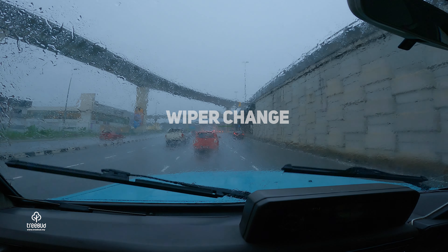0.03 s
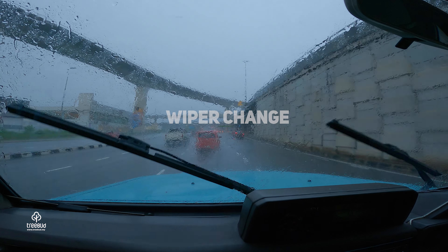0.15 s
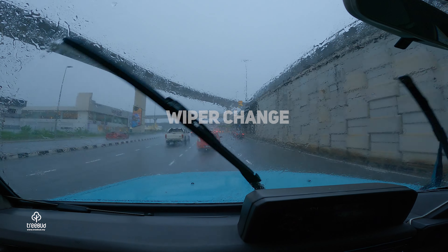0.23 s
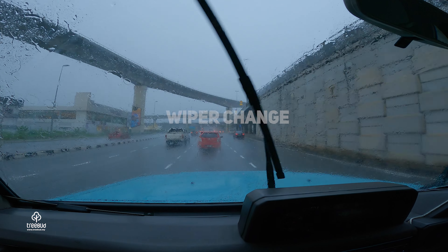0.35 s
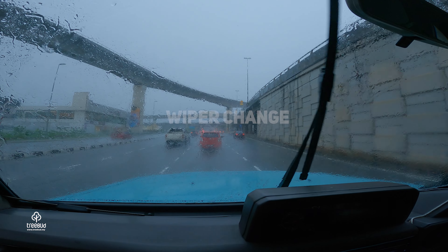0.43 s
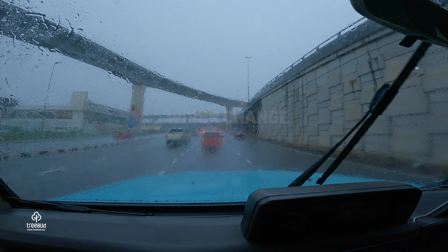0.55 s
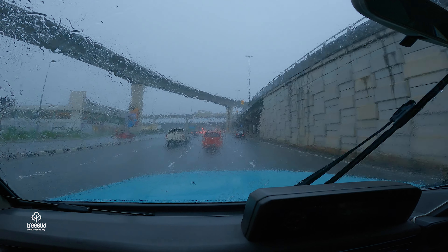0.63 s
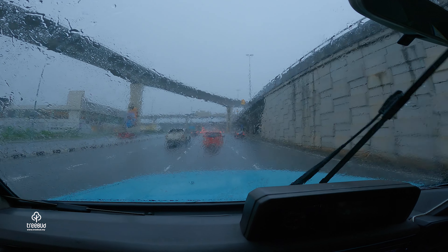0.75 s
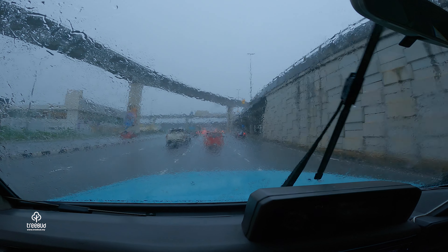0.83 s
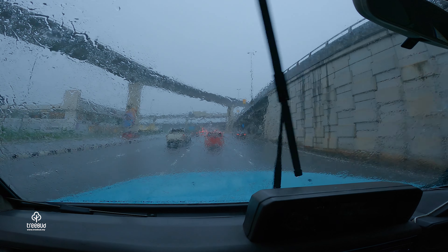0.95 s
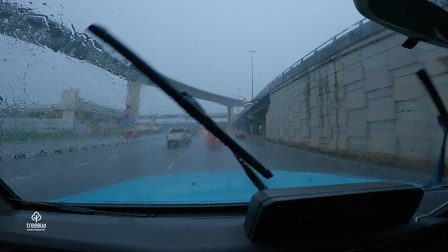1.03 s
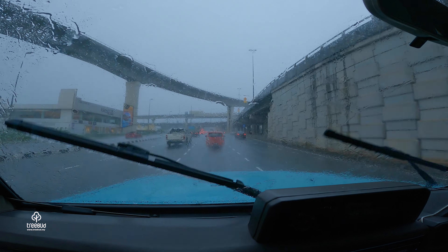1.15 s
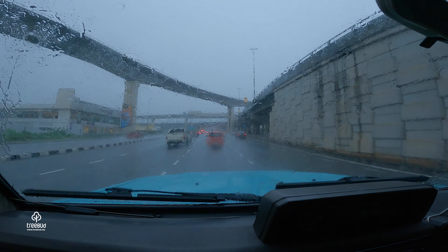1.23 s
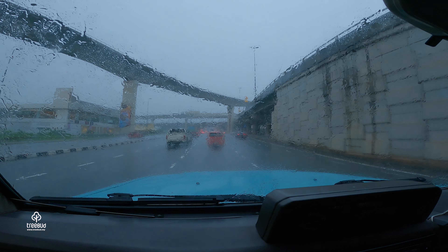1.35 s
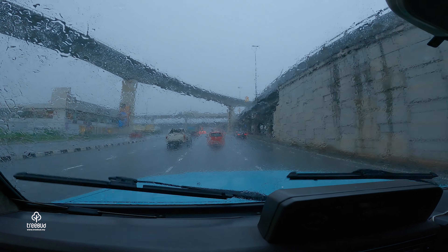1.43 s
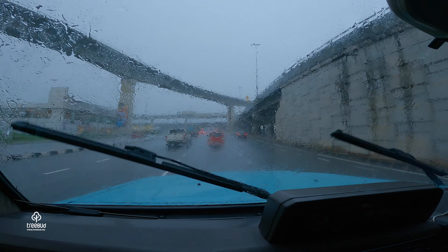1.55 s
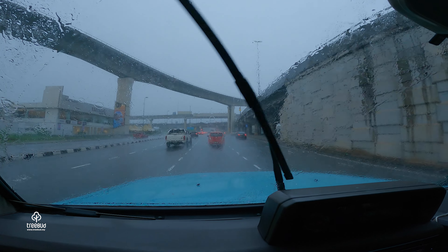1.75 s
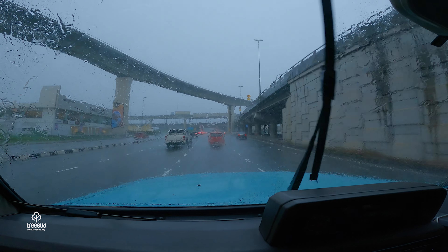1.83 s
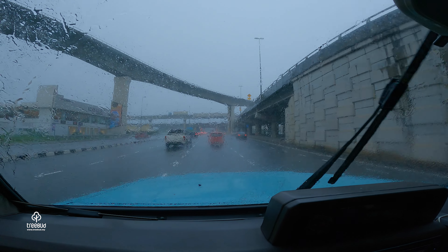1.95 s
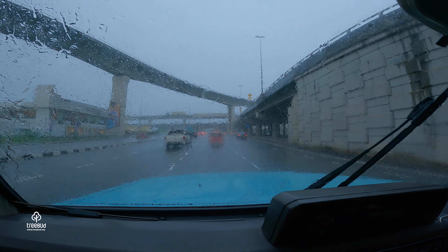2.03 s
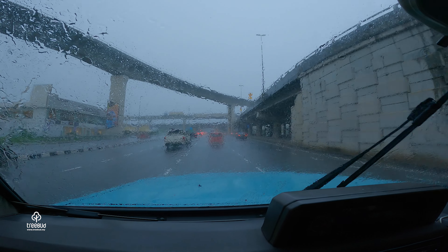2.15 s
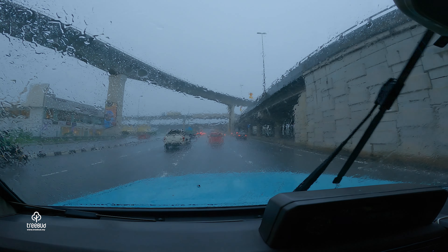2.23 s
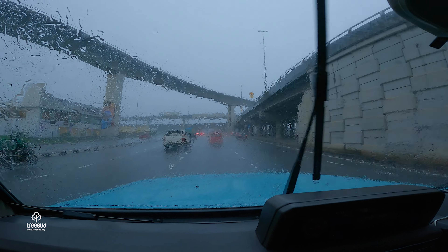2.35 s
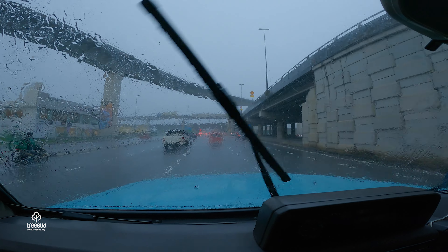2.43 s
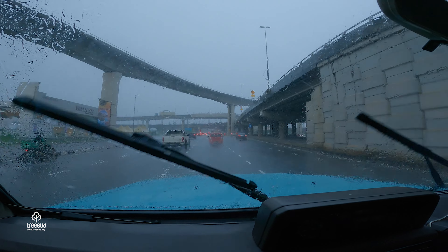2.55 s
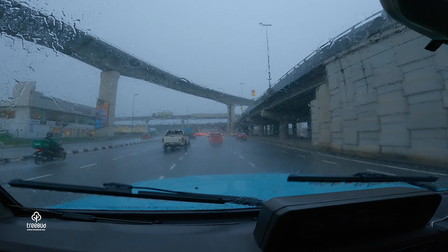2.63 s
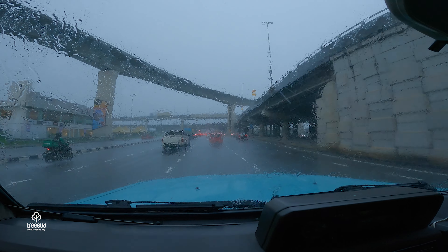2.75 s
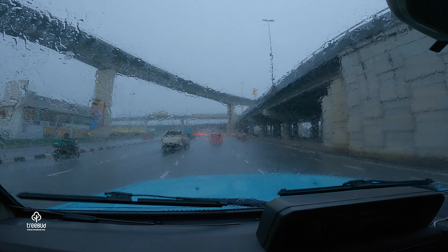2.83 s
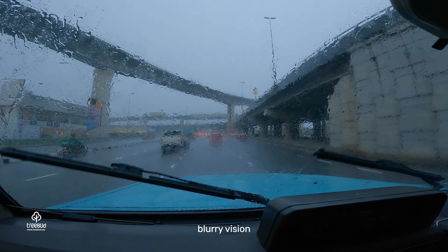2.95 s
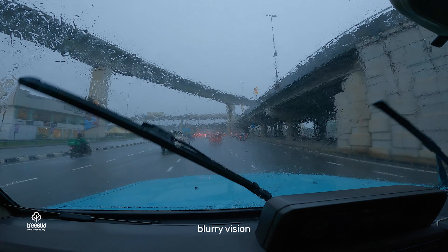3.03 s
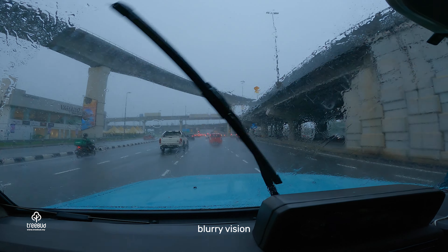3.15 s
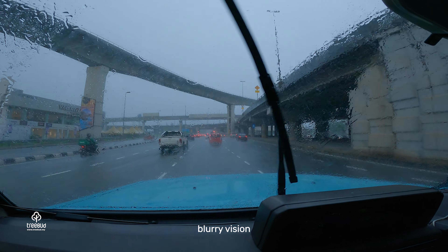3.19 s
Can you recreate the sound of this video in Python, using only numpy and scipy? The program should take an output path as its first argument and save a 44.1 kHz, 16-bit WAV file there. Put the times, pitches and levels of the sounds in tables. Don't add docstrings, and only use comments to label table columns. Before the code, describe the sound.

Cab interior, stereo microphone behind the windshield: bright uneven rain patter dominates, surging in small sheets, with occasional hard drops. Rubber wiper blades snap over in paired clicks with a little thrown water, each later pair preceded by a dull linkage knock. The engine drones deep and steady, sagging slightly in pitch, over shuddering panels and tyre roar. Late on, rain and engine drop away, and soft low road noise with a barely audible whine remains.

```python
import sys
import numpy as np
from scipy import signal
from scipy.fft import rfft, irfft
from scipy.io import wavfile
from scipy.ndimage import uniform_filter1d

SR = 44100
rng = np.random.default_rng(int(sys.argv[2]) if len(sys.argv) > 2 else 0)


def store_pcm(level_fs):
    pcm = np.round(np.clip(level_fs, -1, 1) * 32767).astype(np.int16)
    wavfile.write(sys.argv[1], SR, np.atleast_2d(pcm).T)


def undo_db(level):
    steps = np.asarray(level, float) / 20
    return 10 ** steps


N = 351512

# hz, density_db (per Hz)
GLASS_SPECTRUM = [(240, -34.5), (500, -4.5), (825, -12), (1050, -7), (1560, -5), (2400, -5), (3730, -3),
                  (5160, -6), (6740, -11), (8290, -22.5), (12200, -33.5), (13700, -42.5), (15000, -50),
                  (16000, -63)]
# start_s, peak_db, ring_hz, left_minus_right_db
LARGE_DROPS = [(0.3086, -14.5, 5980, -2), (0.32, -13.5, 6000, -13), (0.4535, -16, 3530, 1.0),
               (0.4914, -19.5, 3800, 0.0), (0.6017, -14, 3610, 0.5), (0.847, -19, 3260, 1.0),
               (0.8894, -18, 3870, 0.5), (0.9214, -16.5, 2410, 1.0), (0.9693, -14.5, 3580, 0.5),
               (1.2775, -19, 2680, 1.5), (1.3438, -21, 2890, 2.5), (1.4411, -18.5, 2770, 0.5),
               (1.6621, -14, 4430, 0.5), (1.8366, -20, 2880, 0.5), (1.887, -19.5, 3430, 0.5),
               (2.3835, -15.5, 2180, 0.0), (2.703, -16, 3800, 4), (2.7428, -15, 3870, 1.0),
               (2.8894, -19, 2780, 1.0), (3.37, -17.5, 3620, 3), (3.4207, -26, 3280, 1.0),
               (3.5454, -13, 3380, 1.0), (3.8172, -16, 2760, 1.0), (4.0911, -17.5, 3690, 0),
               (4.2243, -15, 2920, 3), (4.5925, -21, 4470, 0.0), (4.7252, -18.5, 4600, 1.0),
               (4.8569, -17, 3660, -0.5), (4.995, -15.5, 4120, 4), (5.2814, -18, 3880, 0.5)]
# start_s, peak_db, left_minus_right_db
NEAR_BLADE_FLIPS = [
    (0.0757, -12.5, 3.5),
    (1.504, -13.5, 1),
    (1.54, -18, 1.5),
    (2.9372, -13.5, 4),
    (4.3582, -17.5, 4),
    (5.784, -16, 4),
]
# start_s, peak_db, left_minus_right_db
FAR_BLADE_FLIPS = [(0.0955, -14, 0.0), (1.5278, -13, -0.5), (2.9562, -16, -0.5), (4.3858, -13, -1),
                   (5.8084, -15, -0.5)]


def evened(x):
    return x / np.sqrt(np.mean(x ** 2) + 1e-20)


def read(points, hz):
    f, value = np.transpose(points)
    return np.interp(np.log(hz + 1), np.log(f + 1), value)


def curves(rows):
    s, *columns = np.transpose(rows)
    return [np.interp(np.arange(N) / SR, s, c) for c in columns]


def add(mix, s, sound):
    part = mix[:, round(s * SR):][:, :sound.shape[1]]
    part += sound[:, :part.shape[1]]


def panned(x, lean_db):
    return x * undo_db([[lean_db / 2], [-lean_db / 2]])


def wander(top_hz):
    lowpass = signal.butter(2, top_hz, fs=SR / 32, output="sos")
    slow = signal.sosfilt(lowpass, rng.standard_normal(N // 32 + 1))
    return evened(np.interp(np.arange(N) / 32, np.arange(len(slow)), slow))


def ring(x, hz, width_hz):
    return signal.lfilter(*signal.iirpeak(min(hz, SR / 2.2), hz / width_hz, SR), x)


def highpassed(x, edge_hz):
    return signal.sosfilt(signal.butter(2, edge_hz, "high", fs=SR, output="sos"), x)


def coloured(x, points):
    gain_db = read(points, abs(np.fft.fftfreq(4096, 1 / SR)))
    log_gain = np.log(undo_db(np.maximum(gain_db, -100)))
    taps = np.fft.ifft(np.exp(np.conj(signal.hilbert(log_gain)))).real[:2048]
    return signal.oaconvolve(x, taps[None], axes=1)[:, :N]


def wash(points, size, patchy_db):
    # hz, left_right_likeness
    likeness = [(60, 0.98), (150, 1.0), (360, 0.97), (890, 0.79), (2190, 0.32), (5390, 0.64), (13200, 0.35)]
    # hz, left_minus_right_db
    lean = [(60, -1), (150, 0), (360, 1.5), (890, 2.5), (2190, 3), (5390, 1.5), (13200, 7)]
    frames, hz = 4 * N // size + 5, np.fft.rfftfreq(size, 1 / SR)
    a, b, c, d, patches = rng.standard_normal((frames, len(hz), 5)).T
    patches = uniform_filter1d(patches, size=9, axis=0)
    patches = evened(uniform_filter1d(patches, size=9, axis=1))
    same = np.clip(read(likeness, hz), 0, 1)[:, None]
    left = a + 1j * b
    right = same * left + np.sqrt(1 - same ** 2) * (c + 1j * d)
    lean_db = read(lean, hz)[:, None] / 2
    level_db = read(points, hz)[:, None] + patchy_db * patches + np.array([lean_db, -lean_db])
    z = np.array([left, right]) * undo_db(level_db)
    return evened(signal.istft(z, nperseg=size, noverlap=3 * size // 4)[1][:, :N])


def fade():
    end_s, length_s = 6.576, 0.65
    return np.sin(np.pi / 2 * np.clip((end_s - np.arange(N) / SR) / length_s, 0, 1))


def engine():
    # start_s, firing_hz, boom_db
    revs = [(0.0, 67.5, -15.5), (.14, 68.3, -14.5), (1.0, 70.97, -15), (2.0, 72.64, -16.5),
            (3.0, 70.7, -16.5), (3.67, 68.7, -16.5), (4.05, 67.3, -16), (5.27, 64.0, -17),
            (6.0, 61.4, -20.5), (6.6, 57, -17.5)]
    overtones = [(2, -4.5, 2.5), (3, -17.5, 2), (4, -26, 5), (6, -25.5, 4.5)]
    # hz, gain_db
    pipe = [(118, -12), (129, 4), (134, -6.5), (142, 3), (165, 6), (186, 12.5), (202, 1), (300, 3)]
    # hz, width_hz, level_db
    cabin = (126, 7.7, -40)
    firing_hz, boom_db = curves(revs)
    over_db = boom_db - 16.5 + 1.5 * wander(top_hz=3.6)
    turn = 2 * np.pi * np.cumsum(firing_hz + 0.363 * wander(top_hz=3.2)) / SR
    tone = undo_db(boom_db + 0.4 * wander(top_hz=8.7)) * np.cos(turn)
    for multiple, db, waver_db in overtones:
        level_db = over_db + db + read(pipe, multiple * firing_hz) + waver_db * wander(top_hz=7.4)
        tone += undo_db(level_db) * np.cos(multiple * turn + 0.73 * wander(top_hz=2.2))
    mode_hz, width_hz, mode_db = cabin
    hum = ring(rng.standard_normal(N), mode_hz, width_hz)
    hum = evened(ring(hum, mode_hz, width_hz))
    return panned(fade() * (np.sqrt(2) * tone + undo_db(mode_db + over_db + 33.5) * hum), 0.3)


def rumble(points):
    gain = undo_db(read(points, np.fft.rfftfreq(N, 1 / SR)))
    return evened(irfft(rfft(rng.standard_normal(N)) * gain, N))


def shakes(rows, half_s):
    reach_s = 0.4
    out, t = np.zeros((1, N + SR)), np.arange(-reach_s, reach_s, 1 / SR)
    for (s, db, hz), phase in zip(rows, rng.random(len(rows))):
        swell = undo_db(db + 2.5) * np.exp(-(t / half_s) ** 2 / 2)
        add(out, s, (swell * np.cos(2 * np.pi * (hz * t + phase)))[None])
    return out[0, round(reach_s * SR):][:N]


def road():
    # hz, level_db
    whine_tones = [(3999.5, -73)]
    # hz, density_db (per Hz)
    bounce_spectrum = [(6, -43), (11, 12), (16, -5), (22, -0.5), (30, -46), (60, -108)]
    # hz, density_db (per Hz)
    shudder_spectrum = [(15, -34), (28, 4), (40, 5), (50, 1.5), (62, -13), (110, -85.5)]
    # peak_s, level_db, ring_hz
    jolts = [(0.17, -33, 39.7), (0.31, -41, 42.7), (0.59, -22.5, 40.5), (0.77, -30, 39), (1.21, -27, 42.7),
             (1.44, -30, 44.4), (1.57, -23, 42.0), (1.76, -26, 41), (1.93, -37, 39.4), (2.05, -21, 38.7),
             (2.31, -23, 42.44), (2.48, -37, 41.44), (2.76, -25, 38.9), (3.08, -28, 41.3),
             (3.31, -25, 40.4), (3.5, -18.5, 43.5), (3.79, -25, 41.2), (4.22, -20.5, 41), (4.49, -34, 40.9),
             (4.81, -24, 40.02), (5.17, -25, 40.9), (5.46, -20.5, 40.4), (5.69, -17.5, 41.7),
             (6.11, -26, 42.8), (6.35, -45, 41.75)]
    # peak_s, level_db, ring_hz
    bounces = [(0.11, -39, 14), (0.85, -33, 16.8), (1.26, -29, 18), (1.64, -25, 17.4), (2.14, -32, 27),
               (2.53, -36, 11), (2.93, -25, 23), (3.27, -24, 13), (3.67, -23, 18), (4.09, -30, 23),
               (4.32, -26, 16.5), (4.55, -23, 18.4), (4.77, -23, 15.2), (5.13, -25, 20.8), (5.4, -25, 16),
               (5.64, -24, 16.5), (6.31, -44, 28.4)]
    # hz, density_db (per Hz)
    roar_spectrum = [(26, -22), (45, 9), (79, 1.5), (98, 4), (131, -4), (162, -3), (273, -12), (449, -17),
                     (774, -20.5), (1000, -17), (1950, -28), (3790, -36.5), (4070, -36), (7540, -43),
                     (13000, -64.5)]
    # start_s, level_db
    roar_levels = [(0, -36.5), (3, -35), (4.5, -37), (5.9, -36), (6.5, -38), (7.97, -38)]
    t = np.arange(N) / SR
    whine = sum(undo_db(db + 5.5) * np.sin(2 * np.pi * hz * t) for hz, db in whine_tones)
    body = undo_db(-31) * rumble(bounce_spectrum) + undo_db(-31) * rumble(shudder_spectrum)
    body = body * (fade() + undo_db(-14))
    body += shakes(jolts, half_s=0.082) + shakes(bounces, half_s=0.11)
    roar = wash(roar_spectrum + [(14500, -100)], size=2048, patchy_db=0.6)
    roar_db = curves(roar_levels)[0] + 8 + 0.42 * wander(top_hz=5.3)
    return body + undo_db(roar_db) * roar + whine


def drops(per_s, spread_db, t60_s, apart):
    size = undo_db(spread_db * np.minimum(rng.exponential(1, N), 3.8)) * (rng.random(N) < per_s / SR)
    place, t, out = rng.integers(0, 6, N), np.arange(800) / SR, np.zeros((2, N))
    for k in range(6):
        shared, differing = rng.standard_normal((2, len(t)))
        length_draw, lean_draw = rng.standard_normal(2)
        pair = np.array([shared + apart * differing, shared - apart * differing])
        decay = undo_db(-60 * t / (t60_s * undo_db(5.6 * length_draw)))
        burst = panned(pair * decay, 1.5 * lean_draw)
        out += signal.oaconvolve((size * (place == k))[None], burst, axes=1)[:, :N]
    return evened(coloured(out, GLASS_SPECTRUM))


def surges():
    rise_s, drain_s = 0.0045, 0.029
    hits = np.zeros(N)
    for rows, over_db in (LARGE_DROPS, 15), (NEAR_BLADE_FLIPS + FAR_BLADE_FLIPS, 12):
        for s, db, *_ in rows:
            hits[round(s * SR)] += undo_db(db + over_db) ** 2
    t = np.arange(-4000, 4001) / SR
    shape = np.exp(np.where(t < 0, t / rise_s, -t / drain_s))
    return 10 * np.log10(1 + abs(signal.oaconvolve(hits, shape, "same")))


def rain():
    # start_s, strength_db
    strength = [(0.0, -34.5), (.24, -38.5), (.9, -36), (1.3, -35), (1.75, -36.5), (1.92, -34.5), (2.1, -40),
                (2.45, -40), (2.65, -36), (2.92, -36), (3.12, -40), (3.4, -35.5), (3.56, -38),
                (3.71, -44.5), (3.84, -38), (4.3, -39.5), (5.1, -37.5), (6.5, -40)]
    strength_db = curves(strength)[0] + surges() + 0.46 * wander(top_hz=10.5)
    falling = fade()
    bright_db = 1.5 + 0.44 * (strength_db + 41.5) + 2.0 * (falling - 1)
    landings = np.minimum(rng.exponential(1, N), 3) * (rng.random(N) < 220 / SR)
    landings = uniform_filter1d(landings, size=15)
    sheets = signal.lfilter([1], [1, -np.exp(-1 / (0.004 * SR))], landings)
    sheets += 1.02 * sheets.mean()
    sheets /= uniform_filter1d(sheets, size=4000)
    gusts = undo_db(0.15 * wander(top_hz=26.0)) * np.sqrt(sheets)
    hiss = undo_db(1.5) * wash(GLASS_SPECTRUM, size=256, patchy_db=0.94)
    patter = drops(per_s=2200, spread_db=3.76, t60_s=0.01, apart=0.21)
    patter += undo_db(-2.0) * drops(per_s=300, spread_db=2.7, t60_s=0.0095, apart=0.21)
    ticks = highpassed(drops(per_s=59, spread_db=6.7, t60_s=0.003, apart=0.55), 5000)
    wet = gusts * (hiss + patter) + undo_db(-9) * ticks
    treble_gain = undo_db(bright_db) * sheets ** 0.29 - 1
    return undo_db(strength_db - 3.0) * falling * (wet + treble_gain * highpassed(wet, 6500))


def flip(modes, rise_s, spray_db):
    t = np.arange(3000) / SR
    onset = np.minimum(t / rise_s, 1)
    snap = np.zeros((2, len(t)))
    for hz, db, t60_s in modes:
        detune, phase, side = rng.uniform(-0.3, 1, 3)
        turn = 2 * np.pi * hz * (1 + 0.024 * detune) * t + 0.44 * phase
        ear_phase = np.array([[1.3 * side], [-0.35 * side]])
        snap += undo_db(db - 60 * t / t60_s) * np.sin(turn + ear_phase)
    snap *= onset ** 2
    snap /= np.sqrt(uniform_filter1d(snap ** 2, size=60).max())
    spray = evened(coloured(rng.standard_normal((2, len(t))), GLASS_SPECTRUM)[:, :len(t)])
    spray_gain = undo_db(spray_db - 60 * t / 0.043) + undo_db(-21.0 - 60 * t / 0.01)
    crack_hz = 5000
    crack = ring(ring(rng.standard_normal(len(t)), crack_hz, crack_hz), crack_hz, crack_hz)
    crack *= undo_db(-3 - 60 * t / 0.012)
    return snap + (crack + spray * spray_gain) * onset


def wipers():
    # hz, level_db, t60_s
    near_modes = [(2900, -9, .008), (3600, -2, .009), (4300, -4, .008), (5100, -3, .009), (6100, -4, .008),
                  (6700, -6, .008), (7800, -10, .007), (9000, -14, .007), (10300, -19, .007),
                  (11800, -20, .007)]
    far_modes = [(897, -12, 0.072), (2460, -6.5, 0.041), (3280, -21, 0.01), (3830, 5, 0.02),
                 (4600, -4, 0.021), (5040, 4.5, 0.01), (5950, 0.5, 0.013), (6980, -5, 0.02),
                 (7870, -11, 0.019), (9060, -7.5, 0.0094), (10500, -18, 0.018)]
    # start_s, peak_db, ring_hz
    knocks = [
        (1.428, -26, 960),
        (2.862, -28, 980),
        (4.286, -25, 979),
        (5.71, -23.5, 946.5),
    ]
    out, t = np.zeros((2, N)), np.arange(3000) / SR
    for s, db, lean_db in NEAR_BLADE_FLIPS:
        add(out, s, panned(flip(near_modes, rise_s=0.0005, spray_db=-11), lean_db) * undo_db(db - 6))
    for s, db, lean_db in FAR_BLADE_FLIPS:
        add(out, s, panned(flip(far_modes, rise_s=0.0004, spray_db=-7), lean_db) * undo_db(db - 6))
    for s, db, hz in knocks:
        drive = rng.standard_normal(len(t)) * undo_db(-60 * t / 0.08) * np.minimum(t / 0.003, 1)
        knock = ring(ring(drive, hz, 400), hz, 600)
        knock += 0.85 * ring(ring(drive, 670, 400), 510, 600)
        add(out, s, panned(knock / abs(knock).max(), 1.5) * undo_db(db))
    return out


def splats():
    out, t = np.zeros((2, N)), np.arange(2200) / SR
    envelope = undo_db(-60 * t / 0.011) * np.minimum(t / 0.0012, 1)
    for s, db, hz, lean_db in LARGE_DROPS:
        shared, differing = rng.standard_normal((2, len(t)))
        burst = np.array([shared + 0.5 * differing, shared - 0.19 * differing])
        burst = coloured(burst * envelope, GLASS_SPECTRUM)[:, :len(t)]
        burst = burst + 0.4 * ring(burst, hz, 900)
        add(out, s, panned(burst / abs(burst).max(), lean_db) * undo_db(db - 6))
    return out


def scene():
    return engine() + road() + rain() + wipers() + splats()


def top_cut(x):
    return signal.sosfilt(signal.butter(12, 15830, fs=SR, output="sos"), x)


def record(dry):
    return top_cut(dry)


dry = scene()
out = record(dry)
store_pcm(out)
```